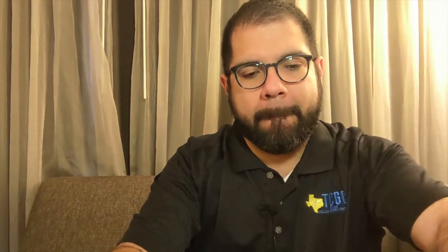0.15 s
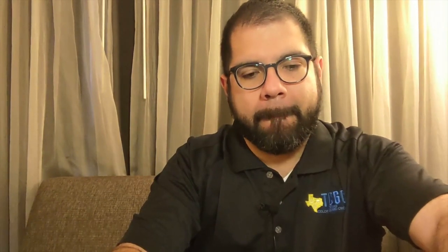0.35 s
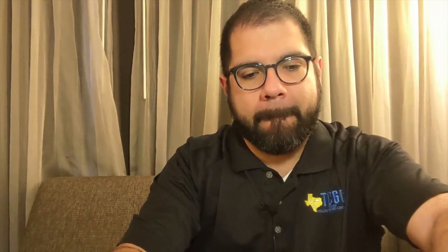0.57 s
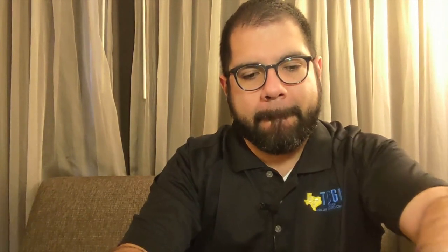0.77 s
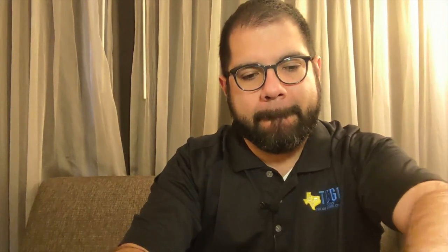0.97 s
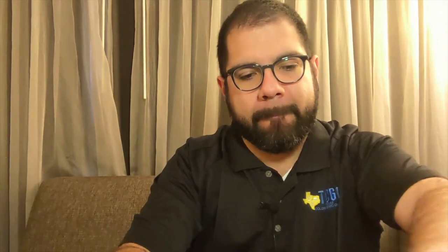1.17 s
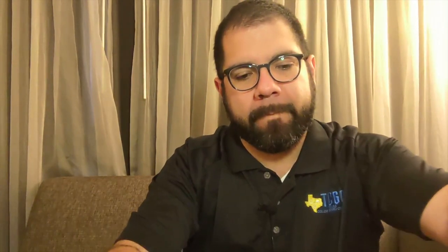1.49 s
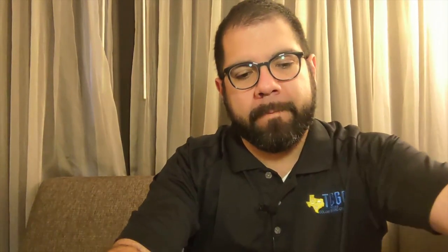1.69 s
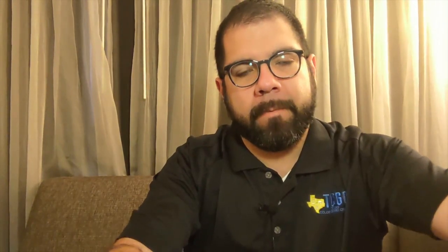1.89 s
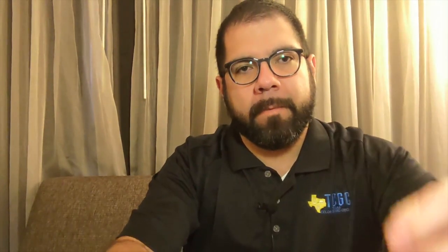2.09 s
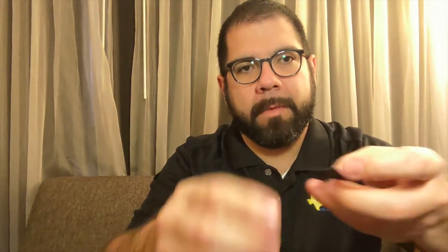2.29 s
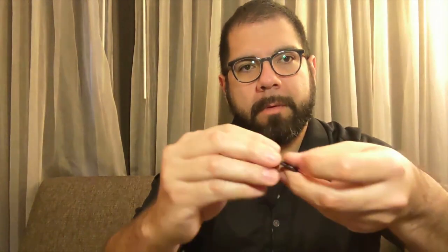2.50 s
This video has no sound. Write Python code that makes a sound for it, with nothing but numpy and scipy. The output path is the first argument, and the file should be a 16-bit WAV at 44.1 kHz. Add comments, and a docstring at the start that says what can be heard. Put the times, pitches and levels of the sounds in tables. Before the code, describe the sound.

Small plastic cards click and rattle on a hollow tabletop. Quiet ventilation rumble and barely audible hand scuffs fill the first second. A crisp, bright tick comes at 1.3 s, with lighter ticks from 1.6 s. A loud, sharp clack lands at 1.9 s, another with a woody knock at 2.1 s, then dense rattling thins into quick small clicks until about 2.65 s. Close stereo, short dry room.

```python
"""Plastic cards on a hollow tabletop

Small plastic cards are picked up, dropped and left rocking on a hollow tabletop in a curtained room.
Each contact is a noise burst driving a short resonance; heavy ones strike the modes of the tabletop.
Fingers rustle the cards between contacts as dense random ticks; the hand scuffs as grainy noise.
Ventilation rumbles below as shaped noise; a close pair of microphones hears it all."""
import sys
import numpy as np
from scipy import signal
from scipy.fft import rfft, irfft
from scipy.io import wavfile

SR = 44100
rng = np.random.default_rng(int(sys.argv[2]) if len(sys.argv) > 2 else 0)


def convert_level_to_amplitude(level_db):
    """Map a level in decibels to its linear amplitude factor."""
    exponent = np.asarray(level_db, float) / 20
    return 10 ** exponent


def generate_wav(signal):
    """Clip the signal to [-1, 1] and save it as 16-bit WAV at the path in sys.argv[1]."""
    frames = np.transpose(np.atleast_2d(signal))
    scaled = np.clip(frames, -1, 1) * 32767
    pcm = np.round(scaled).astype(np.int16)
    wavfile.write(sys.argv[1], SR, pcm)


N = 116865  # length in samples
MIRROR = np.array([[1], [-1]])  # opposite signs at the left and right ear


def rms_one(x):
    """Normalisation to unit effective value (rms 1)."""
    return x / np.sqrt(np.mean(x ** 2) + 1e-20)


def unit(x):
    """Normalisation to unit energy in the first two rows."""
    return x / np.sqrt(np.sum(x[:2] ** 2) + 1e-20)


def at_hz(points, hz, column=1):
    """Interpolation of a table column along a logarithmic frequency axis."""
    points = np.array(points)
    return np.interp(np.log(hz), np.log(points[:, 0]), points[:, column])


def cut(x, hz, kind, order=2):
    """Butterworth filtering: a maximally flat pass band."""
    return signal.sosfilt(signal.butter(order, hz, kind, fs=SR, output="sos"), x)


def ring(x, hz, t60):
    """Damped resonance: a unit impulse excites a decaying sine of initial height 1."""
    radius, angle = convert_level_to_amplitude(-60 / (t60 * SR)), 2 * np.pi * hz / SR
    return signal.lfilter([0, np.sin(angle)], [1, -2 * radius * np.cos(angle), radius * radius], x + 1e-18)


def pair(size):
    """Interaural coherence: noise alike at both ears in the bass, partly unlike above."""
    alike_below_hz, unlike_db = 1600, -2
    mid, side = rng.standard_normal((2, size))
    return mid + convert_level_to_amplitude(unlike_db) * cut(side, alike_below_hz, "high") * MIRROR


def left_over_right(db):
    """Level difference between the ears, shared equally: left up by half, right down by half."""
    return convert_level_to_amplitude(db / 2 * MIRROR)


def add(out, s, piece):
    """Superposition: a piece is summed into the signal from time s."""
    i = max(int(s * SR), 0)
    out[..., i:i + piece.shape[-1]] += piece


# Relative spectral density of the steady noise: (f/Hz, level/dB per Hz)
RUMBLE_SPECTRUM = [(15, -58), (30, -52), (42, -9.5), (60, -4.5), (138, -12), (220, -13.5), (349, -19),
                   (399, -13.5), (634, -27), (746, -25), (1430, -35.5), (6000, -49), (14800, -58),
                   (16500, -51)]
# Left-right correlation of the steady noise: (f/Hz, correlation from -1 to 1)
EAR_LIKENESS = [(60, 0.95), (130, 0.9), (290, 0.89), (640, 0.71), (1410, -0.16), (3100, -0.2), (6820, 0.21),
                (15000, -0.44)]


def rumble():
    """Stationary noise of set spectrum and coherence: ventilation and microphone hiss."""
    rumble_db, left_db = -48, -1.2
    hz = np.maximum(np.fft.rfftfreq(N, 1 / SR), 1)
    mid, side = rfft(rng.standard_normal((2, N)))
    alike = np.clip(at_hz(EAR_LIKENESS, hz), -1, 1)
    # The shares of common and opposed noise fix the correlation at each frequency.
    both = np.sqrt(1 + alike) * mid + np.sqrt(1 - alike) * side * MIRROR
    both = irfft(convert_level_to_amplitude(at_hz(RUMBLE_SPECTRUM, hz)) * both, N)
    return convert_level_to_amplitude(rumble_db) * both / np.std(both.mean(axis=0)) * left_over_right(left_db)


# Reverberation of the curtained room: (f/Hz, level/dB, t60/s)
ROOM_DECAY = [(335, 8, 0.25), (890, -9, 0.13), (1850, -2.5, 0.12), (5260, -10.5, 0.24), (12500, -8.5, 0.19)]


def room(x):
    """Diffuse reverberation: convolution with noise that decays exponentially, band by band."""
    delay_s, tail_s, alike_below_hz = 0.003, 0.4, 680
    t = np.arange(int(tail_s * SR)) / SR
    mid, side = rng.standard_normal((2, 2, 1, len(t)))
    white = mid + cut(side, alike_below_hz, "high") * MIRROR
    edges, tail = np.geomspace(100, 18000, 9), 0
    for k, (low, high) in enumerate(zip(edges, edges[1:])):
        hz = np.sqrt(low * high)
        decay = convert_level_to_amplitude(-60 * t / at_hz(ROOM_DECAY, hz, column=2))
        # Neighbouring bands take independent noises.
        band = cut(white[k % 2], [low, high], "band") * decay / np.sqrt(np.sum(decay ** 2))
        tail = tail + convert_level_to_amplitude(at_hz(ROOM_DECAY, hz)) * band
    tail = np.pad(tail, ((0, 0), (int(delay_s * SR), 0)))
    return signal.fftconvolve(x[None], tail, axes=1)[:, :N]


# Rustle and rattle of the cards between the clear contacts, a contour read between its points:
# (t/s, level of the dull share/dB, bright share against dull/dB)
RUSTLE_CONTOUR = [(1.198, -103, -12), (1.272, -58, -8), (1.4, -62.5, -1.5), (1.48, -54, -4.5),
                  (1.601, -56.5, -12.5), (1.68, -61.5, -12), (1.702, -44.5, 0.5), (1.76, -46.5, -12),
                  (1.799, -38.5, -1), (1.854, -57, -11), (1.9, -40, -7), (1.969, -43, 3.5),
                  (2.073, -58, -2.5), (2.079, -48, 3), (2.086, -24.5, -3.5), (2.135, -35.5, -2),
                  (2.158, -34, 1.5), (2.183, -40.5, -13), (2.2, -39, 3), (2.3, -62, 3), (2.65, -52, -3)]


def rustle():
    """Random impulse excitation: uneven ticks ring briefly at scattered pitches, with a bright hiss."""
    ticks_per_s, spread_db, grain_s = 4000, 2.5, 0.00029
    low_hz, split_hz, top_hz = 760, 3450, 6000
    decay_cycles = 18.3  # periods of each pitch in a 60 dB decay
    s, db, bright_db = np.transpose(RUSTLE_CONTOUR)
    t = np.arange(N) / SR
    size = convert_level_to_amplitude(spread_db * np.minimum(rng.exponential(1, N), 4))
    ticks = (rng.random(N) < ticks_per_s / SR) * size
    pitch_index, noise = rng.integers(0, 8, N), pair(N)
    keep = np.exp(-1 / (grain_s * SR))

    def grains(impulses):
        """Exponential decay: each tick becomes a short fading grain of noise."""
        return signal.lfilter([1], [1, -keep], impulses) * noise

    dull = 0
    for k, hz in enumerate(np.geomspace(low_hz, split_hz, 8)):
        dull = dull + np.sqrt(hz) * ring(grains(ticks * (pitch_index == k)), hz, decay_cycles / hz)
    bright = cut(grains(ticks), [split_hz, top_hz], "band", order=1)
    mix = rms_one(dull) + convert_level_to_amplitude(np.interp(t, s, bright_db)) * rms_one(bright)
    return convert_level_to_amplitude(np.interp(t, s, db, left=-120)) * mix


# Soft dull scuffs of the hand: (t/s, level/dB, length/s)
HAND_SCUFFS = [(0.154, -56, 0.026), (0.352, -42.5, 0.024), (0.446, -46.5, 0.02), (1.471, -46.5, 0.016)]


def scuffs():
    """Friction noise: band-limited noise of uneven grain under a short envelope, with a faint airy part."""
    grain_db, band_hz = 3, [780, 1940]
    air_db, air_top_hz = -10.5, 6050
    out, t = np.zeros(N + SR), np.arange(4096) / SR
    for s, db, length in HAND_SCUFFS:
        noise = rng.standard_normal(len(t))
        grain = np.repeat(rng.standard_normal(len(t) // 64), 64)  # one level per 64 samples
        noise = rms_one(noise * convert_level_to_amplitude(grain_db * grain))
        body = rms_one(cut(noise, band_hz, "band", order=4))
        body = body + convert_level_to_amplitude(air_db) * cut(noise, air_top_hz, "low")
        envelope = np.minimum(t / 0.015, 1) * np.exp(-(t / length) ** 2)
        add(out, s, convert_level_to_amplitude(db) * body * envelope)
    return out[:N]


# Blows passed into the tabletop: (t/s, level/dB, extra level on the deepest modes/dB)
TABLE_BLOWS = [(.36, -55, -11), (1.289, -46.5, -14), (1.481, -47, .1), (1.686, -44.5, 2),
               (1.79, -42.5, -12), (1.882, -21.5, -16), (1.897, -37.5, -21), (1.974, -37, -16),
               (1.989, -35.5, 1), (2.086, -16, -7), (2.124, -20, -11), (2.154, -30, -20),
               (2.171, -34.5, 9.5), (2.226, -59, 1), (2.287, -40, 0), (2.334, -42, 14), (2.407, -38.5, 5),
               (2.453, -41.5, 3), (2.529, -41.5, 15), (2.571, -44.5, 9), (2.626, -44.5, 3)]
# Modes of the hollow tabletop: (f/Hz, level/dB, t60/s)
TABLE_MODES = [(156.6, -18, 0.12), (217.4, -11, 0.54), (305.5, 0.5, 0.18), (361.2, -1, 0.13),
               (429.4, -9.5, 0.14), (531, -6, 0.03), (674, -6, 0.048), (752, -7.5, 0.056),
               (1115, -16, 0.043)]


def tabletop():
    """Modal superposition: every blow excites the same modes, neighbours in opposite phase."""
    deep_below_hz, low_cut_hz = 260, 150
    s, db, deep_db = np.transpose(TABLE_BLOWS)
    out = 0
    for k, (hz, level_db, t60) in enumerate(TABLE_MODES):
        uneven_db = rng.normal(0, 1, len(s))
        blows = np.zeros(N)
        blows[(s * SR).astype(int)] = convert_level_to_amplitude(db + level_db + deep_db * (hz < deep_below_hz) + uneven_db)
        out = out + (-1) ** k * ring(blows, hz, t60)
    return cut(out, low_cut_hz, "high", order=4)


# Contacts of the cards: (t of the burst peak/s, level/dB, ring f/Hz, treble against body/dB,
# contact length/s, broad body against ring/dB)
CARD_CONTACTS = [(0.0079, -43.5, 4300, -22, 0.0018, -9), (1.2884, -17, 4500, -2.5, 0.00064, 2),
                 (1.59, -29.5, 2820, -8.5, 0.0029, 1), (1.6857, -25.5, 1370, -21, 0.0023, -15.5),
                 (1.7108, -28, 1920, -20, 0.0019, 1), (1.789, -32, 1560, -4, 0.005, -27),
                 (1.802, -27, 1630, -9, 0.0048, -11), (1.8705, -35, 1620, -1, 0.0023, 9),
                 (1.8818, -2.5, 1570, 5, 0.0026, 0.5), (1.897, -10.5, 2550, 6.5, 0.00238, 8),
                 (1.97, -24.5, 4460, -3.5, 0.0037, 17), (1.988, -31.5, 1440, -23, 0.0022, -11),
                 (2.0473, -30.5, 2500, -22, 0.00088, -14), (2.0852, -7, 1640, -29, 0.00086, 4),
                 (2.101, -17, 3100, -8, 0.002, -21), (2.1033, -19, 1800, 1, 0.005, 0),
                 (2.125, -22, 2630, -14, 0.0074, -17), (2.143, -18, 2660, -11, 0.0016, -14),
                 (2.1536, -22.5, 2800, -13, 0.0032, -6), (2.1603, -21, 3940, -3.5, 0.0083, 5),
                 (2.17, -13.5, 1820, -17, 0.001, 2), (2.1906, -21.5, 3580, -11, 0.0017, -2),
                 (2.21, -27.5, 1850, 0, 0.0042, -30), (2.226, -24, 3100, -10, 0.00274, 12),
                 (2.2716, -23, 4800, -1.5, 0.0025, -16), (2.2854, -23.5, 2120, -10, 0.0046, 8),
                 (2.3344, -26, 2970, -4, 0.0032, 5), (2.348, -35.5, 2870, -28, 0.0048, 13),
                 (2.392, -27.5, 4760, -4, 0.0025, 10), (2.4086, -23.5, 2140, -6.5, 0.0043, 9),
                 (2.452, -28, 1990, -7, 0.0027, 14), (2.468, -34, 1850.0, -14, 0.004, 28),
                 (2.509, -33, 2660, -5.5, 0.0033, -10), (2.528, -26, 1800, -14.5, 0.0036, 21),
                 (2.572, -29.5, 3000, -7, 0.0042, 15), (2.6272, -31, 4600, -15, 0.0024, 6),
                 (2.6494, -23, 2080, -35, 0.0014, 13)]


def clicks():
    """Impact excitation: a snap inside a swelling burst of chatter drives a body, a ring and a bright top.

    Rows 0-1 reach the microphones; row 2 goes to the room, where all directions blend evenly."""
    low_hz, treble_from_hz, treble_to_hz = 785, 4830, 12200
    snap_db, ring_in_room_db = 6, -4.5
    ring_q = 5.0  # quality factor of the plastic ring
    out, t = np.zeros((3, N + SR)), np.arange(1024) / SR
    for s, db, hz, treble_db, length, broad_db in CARD_CONTACTS:
        rise = max(length, 4e-4) / 1.8
        peak = int(rise * SR)
        burst = np.zeros((3, len(t)))
        burst[:2] = pair(len(t)) * (t / rise) ** 2 * np.exp(2 - 2 * t / rise) / 2
        burst[:2, peak] += convert_level_to_amplitude(snap_db) * 0.001 / max(length, 0.001)
        burst[2, peak] = np.sqrt(np.sum(burst[0] ** 2))  # one impulse of the left burst's energy
        burst = cut(burst, low_hz, "high", order=3)
        tone = unit(ring(burst, hz, np.log(1000) * ring_q / (np.pi * hz)))
        tone = tone * convert_level_to_amplitude([[0], [0], [ring_in_room_db]])
        broad = unit(cut(burst, treble_from_hz, "low"))
        body = unit(tone + convert_level_to_amplitude(broad_db) * broad)
        top = unit(cut(cut(burst, treble_from_hz, "high"), treble_to_hz, "low"))
        contact = unit(body - convert_level_to_amplitude(treble_db) * top)
        add(out, s - rise, convert_level_to_amplitude(db) * np.sqrt(length * SR) * contact)  # energy grows with contact length
    return out[:, :N]


def scene():
    """Superposition of direct sound, its reverberation (the table reaches it less) and steady rumble."""
    table_echo_db, left_db = -8, -0.95
    contacts, handling = clicks(), scuffs() + rustle()
    table = tabletop()
    echo = room(contacts[2] + handling.mean(axis=0) + convert_level_to_amplitude(table_echo_db) * table)
    events = contacts[:2] + handling + table + echo
    return events * left_over_right(left_db) + rumble()


def low_pass(x):
    """Removes everything above the highest recorded frequency."""
    return signal.sosfilt(signal.butter(12, 17160, fs=SR, output="sos"), x)


def record(dry):
    """Saturation and band limiting: peaks are rounded and the top is cut."""
    ceiling, top_hz = 0.8, 16050
    rounded = ceiling * np.tanh(dry / ceiling)
    return low_pass(cut(rounded, top_hz, "low", order=24))


dry = scene()
out = record(dry)
generate_wav(out)
```